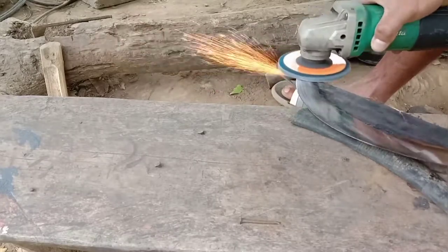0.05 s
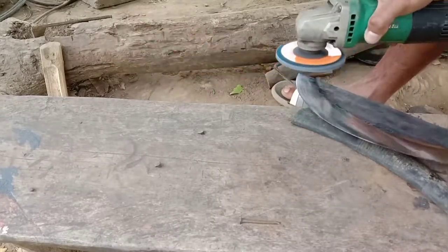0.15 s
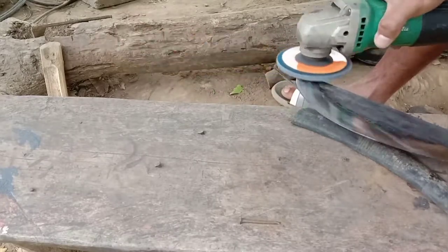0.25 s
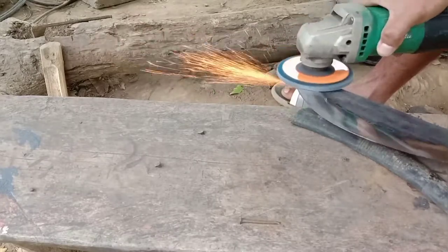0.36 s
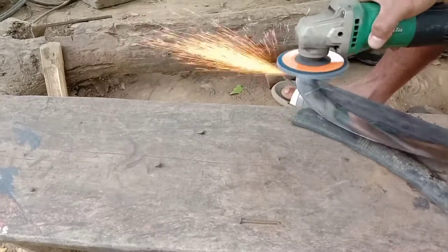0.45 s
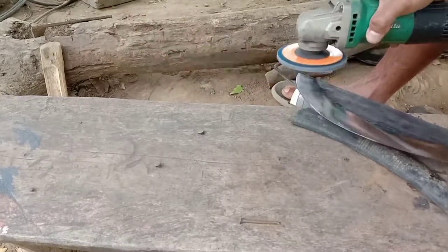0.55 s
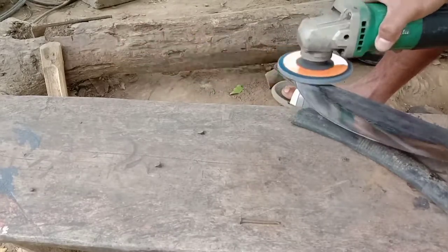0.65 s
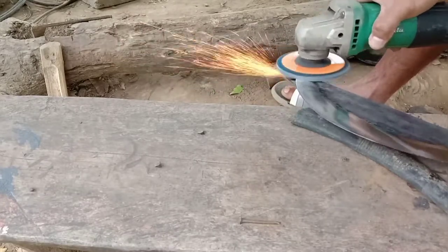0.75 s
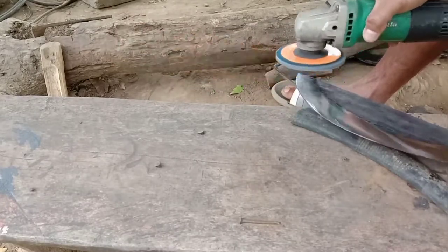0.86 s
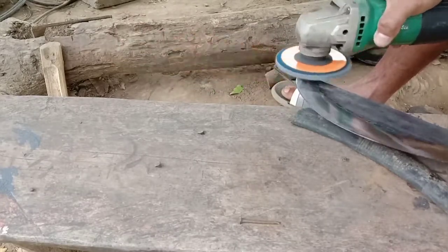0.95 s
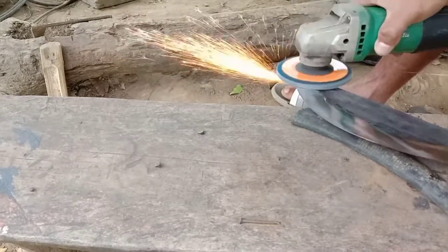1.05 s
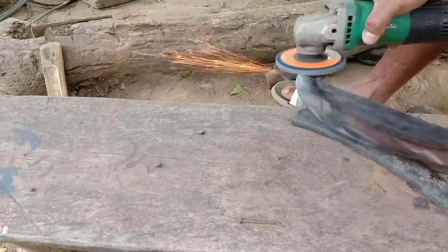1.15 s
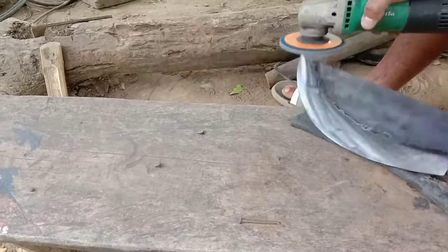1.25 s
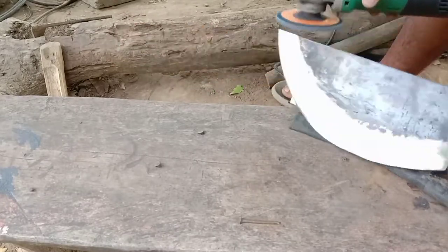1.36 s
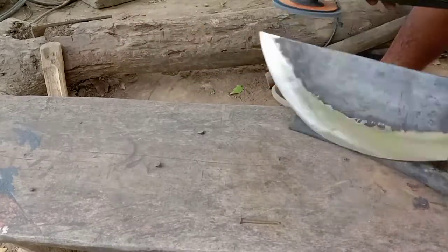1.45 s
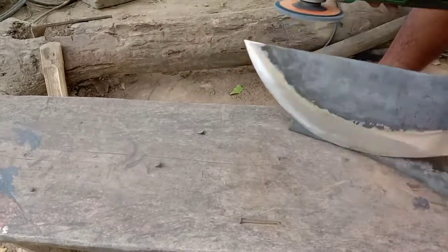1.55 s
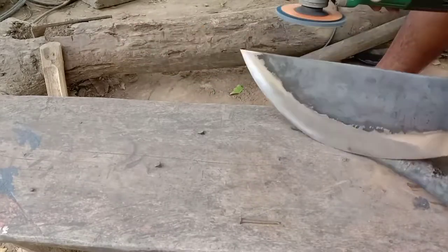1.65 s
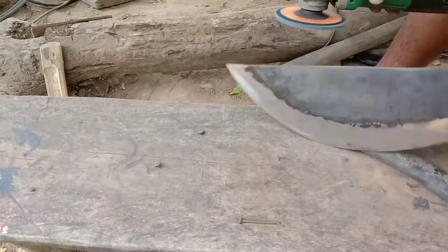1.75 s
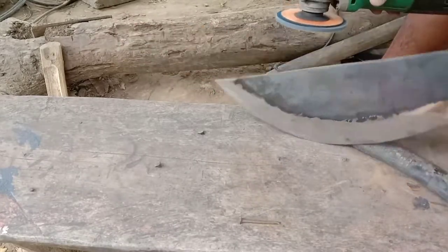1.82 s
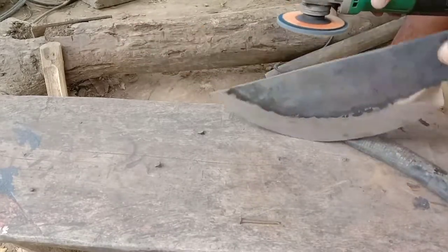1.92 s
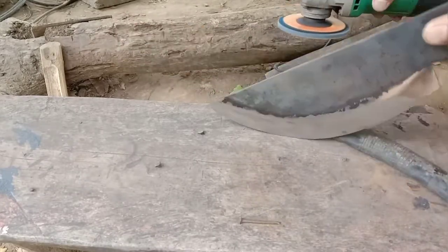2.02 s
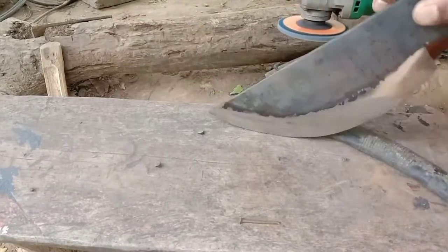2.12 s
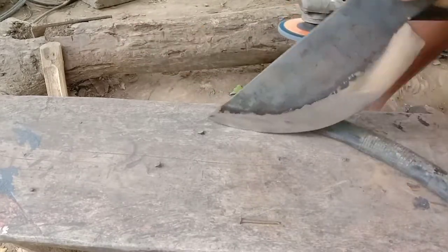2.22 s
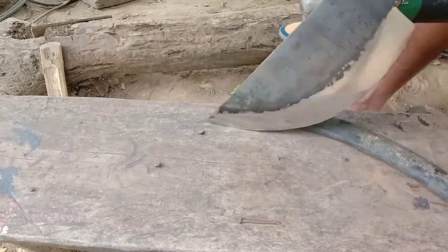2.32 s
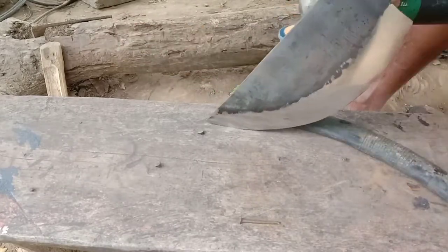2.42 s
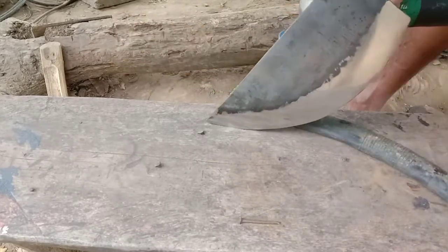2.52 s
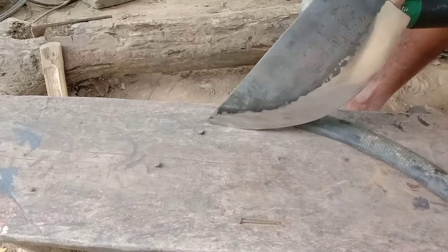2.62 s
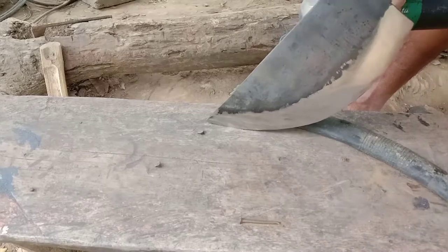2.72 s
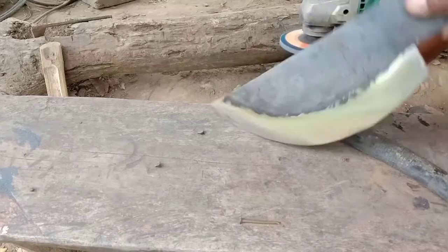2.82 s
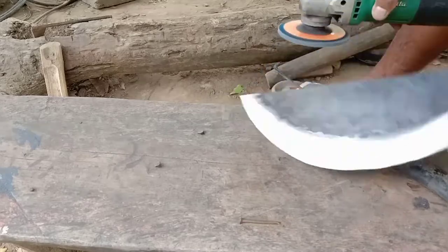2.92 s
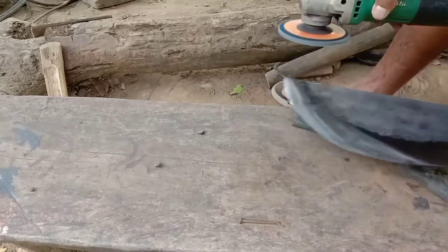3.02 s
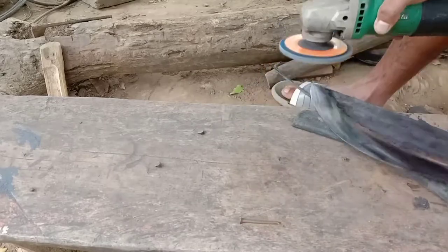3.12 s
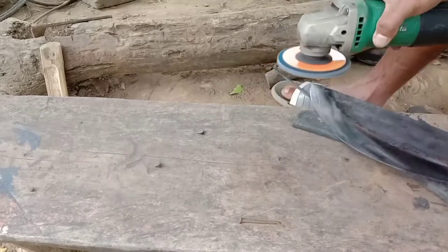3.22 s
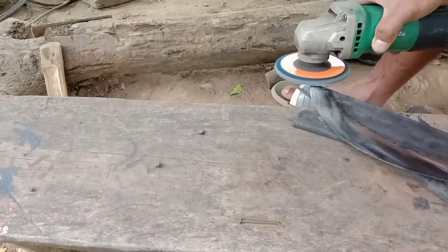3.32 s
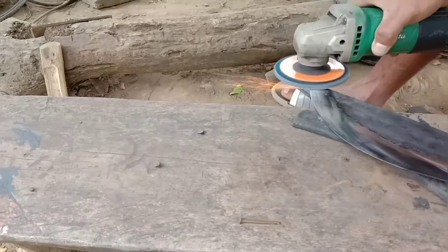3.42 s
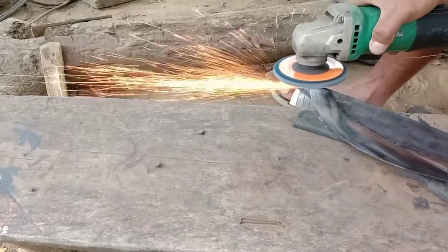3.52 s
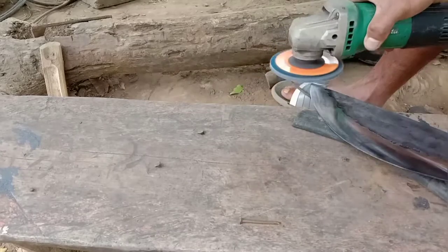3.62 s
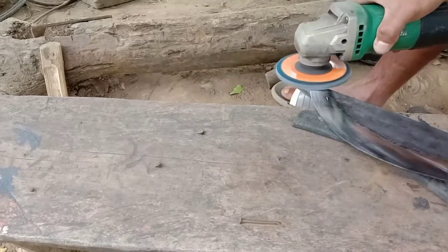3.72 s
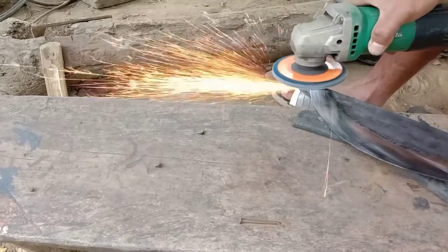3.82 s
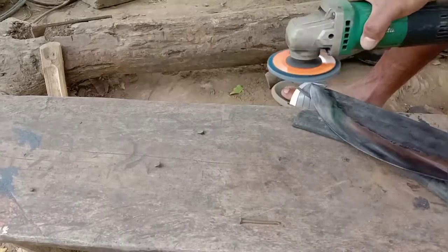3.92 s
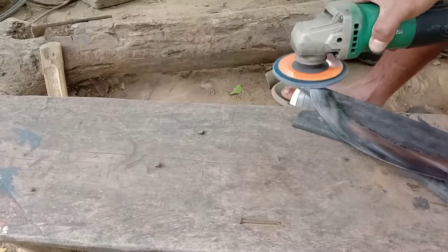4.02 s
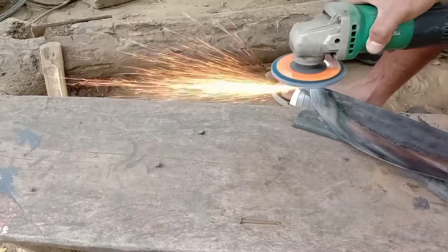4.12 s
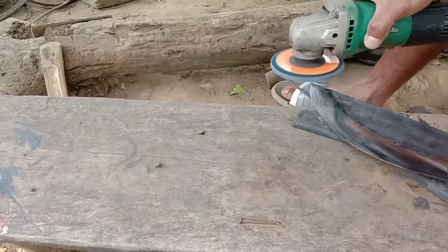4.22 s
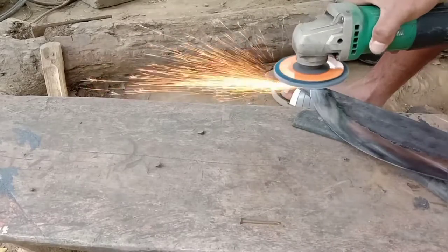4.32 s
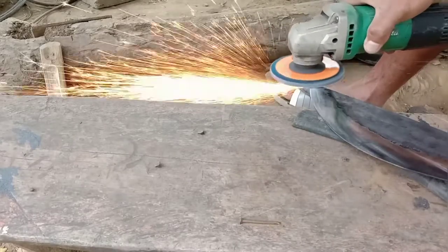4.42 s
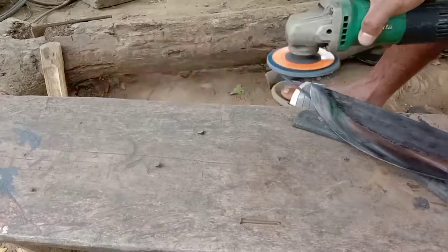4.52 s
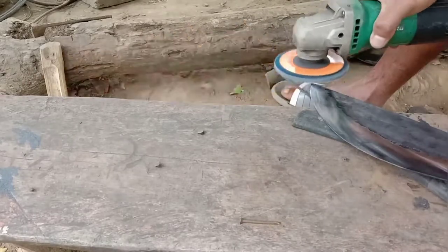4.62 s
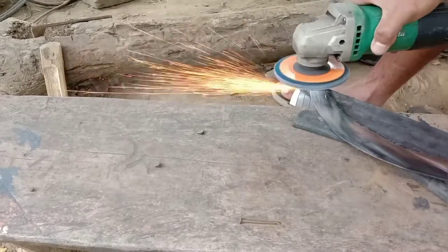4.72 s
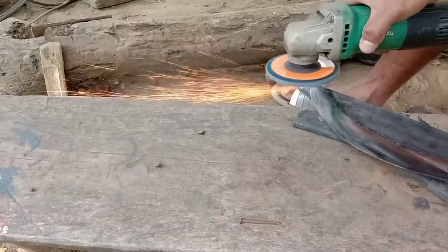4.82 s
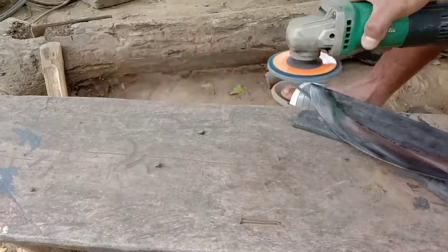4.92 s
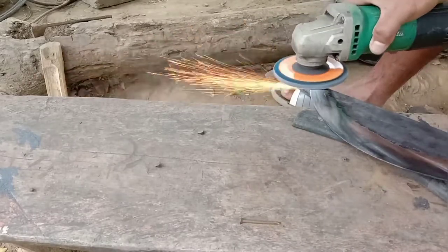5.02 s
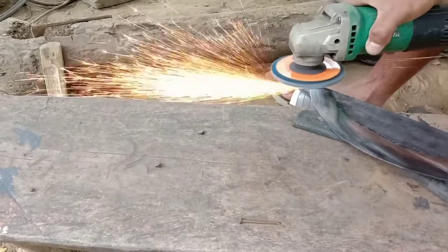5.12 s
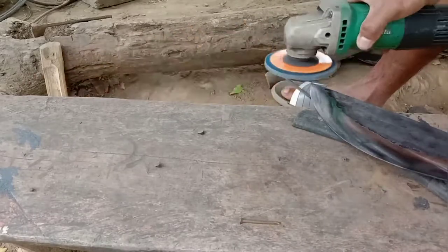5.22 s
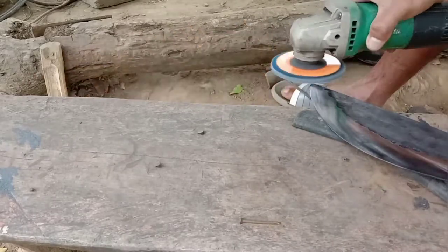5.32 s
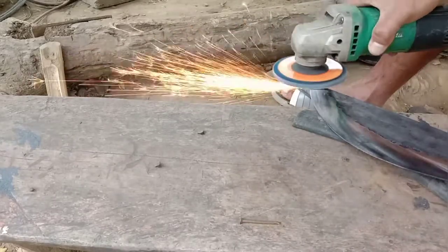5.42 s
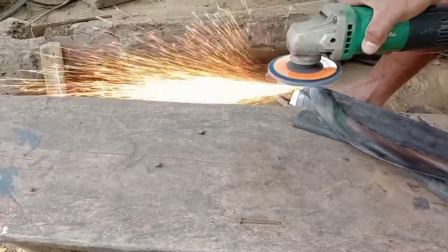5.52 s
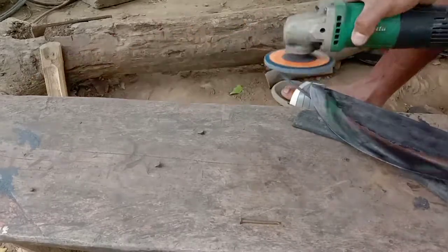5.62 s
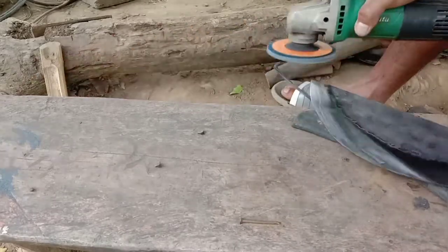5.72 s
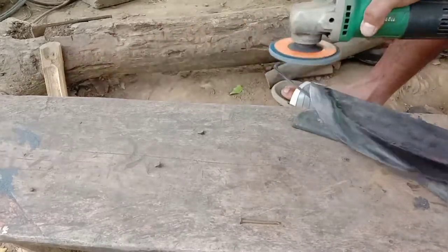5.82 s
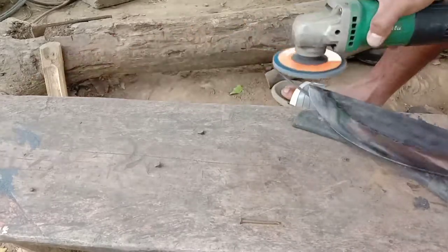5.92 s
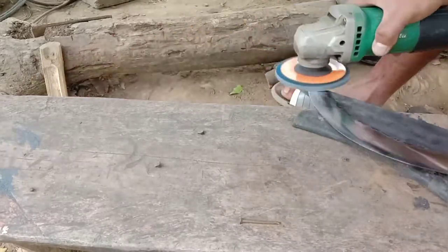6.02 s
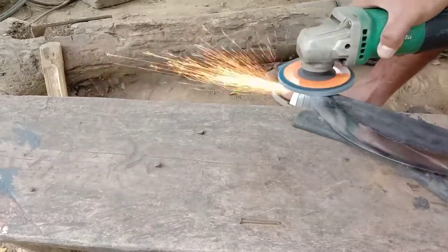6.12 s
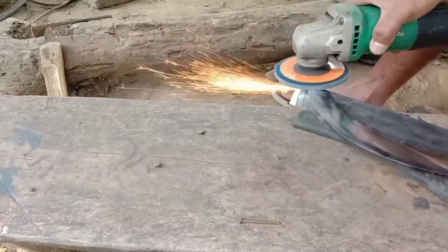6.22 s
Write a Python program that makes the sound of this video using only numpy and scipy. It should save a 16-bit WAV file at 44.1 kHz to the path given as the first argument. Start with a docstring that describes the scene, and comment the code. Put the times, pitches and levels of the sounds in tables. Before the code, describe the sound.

An angle grinder is already running outdoors, a high, siren-like whine over rushing air, with gears churning quietly underneath. From 0.1 to 1.2 seconds its disc bites a steel blade in four short, hissing scrapes, the whine sagging with each and climbing back. Grit strikes the single microphone with pops and crackles, strongest around 0.5 seconds.

From 1.3 to 3.5 seconds the disc spins free. The pitch rises and levels off, and the whine softens between 2 and 3 seconds before returning.

From 3.5 to 5.6 seconds come seven more strokes, about three a second, ringing more brightly, with metallic zings and brief lower groans. The pitch dips with each. Sparks pop and crackle on the microphone, with the densest showers near 5.2 and 5.6 seconds. A last stroke starts at about 6.1 seconds, the grinder still running. A very faint rumble of air lies beneath.

```python
"""A siren-like whine over rushing air: an angle grinder runs outdoors and bites a steel blade in short strokes.
The whine is its cooling fan, which sags under each load and climbs back as the disc spins free.
Abrasive grains hiss on the steel and ring the blade, now and then with a groan or a zing.
Sparks and grit pelt the single microphone with pops and crackling showers.
Underneath, the gears churn and a faint draught rumbles."""
import sys
import numpy as np
from scipy import signal
from scipy.fft import rfft, irfft, next_fast_len
from scipy.io import wavfile
from scipy.ndimage import map_coordinates

SR = 44100
rng = np.random.default_rng(int(sys.argv[2]) if len(sys.argv) > 2 else 0)


def write(x):
    x = np.atleast_2d(x).T
    wavfile.write(sys.argv[1], SR, np.round(np.clip(x, -1, 1) * 32767).astype(np.int16))

N = 276066
T = np.arange(N) / SR

# the fan's whine and its octave, beaming at the microphone as the tool turns in the hand: t/s, level/dB
WHINE_BEAM = [(0, -17), (.19, -20), (.28, -17), (.48, -21.5), (.62, -16.5), (1.2, -19), (1.35, -20.5),
              (1.8, -22.5), (2.18, -32.5), (2.37, -27), (2.5, -37), (2.84, -32.5), (2.93, -25),
              (3.1, -20.5), (3.47, -16.5), (3.66, -22.5), (3.78, -17), (3.94, -20), (5.7, -20.5),
              (6.12, -16.3), (6.26, -17.5)]
OCTAVE_BEAM = [(0, -31.5), (.45, -33.5), (1.15, -32), (1.46, -38.5), (2.06, -36.5), (2.22, -47),
               (2.36, -32.5), (2.85, -35.5), (4.55, -32), (5.45, -32), (5.88, -38.5), (6.05, -33.5),
               (6.26, -26)]
# the grinder turning toward and away from the microphone: t/s, vent rush/dB, brush fizz/dB, vent hollow
# resonance/dB
VENT_BEAM = [(0, -25, -30, -31.5), (1.08, -24, -27, -30), (1.35, -24.5, -41, -46), (1.6, -25, -44, -35),
             (2.05, -29, -38.5, -36), (2.6, -28.5, -33, -38.5), (2.85, -28.6, -37.5, -38),
             (3, -25.5, -38, -36), (3.3, -25.5, -32, -34), (3.55, -25, -34, -33), (4.5, -23.5, -31, -35),
             (5.4, -23, -33, -38), (5.85, -24.5, -33, -30), (6.1, -25.5, -27, -32.5), (6.26, -22, -27, -42)]
# tone colour of the air's rush and of the brushes' fizz: f/Hz, level/dB
RUSH_EQ = [(400, -31), (1000, -14.5), (1800, -13), (2500, -12.5), (3300, -6), (3900, -6), (5000, -1.5),
           (5800, 4), (6250, -6), (7500, -6), (8300, -11), (9400, -16.5), (12000, -16), (15400, -13)]
FIZZ_EQ = [(5000, -26), (9500, -13), (12200, 1.5), (13800, 1), (15300, 6.5)]
# the vents' hollow resonance: f/Hz, width/Hz, level/dB
HOLLOW_MODE = [(4430, 880, 0)]
# the disc on the steel; load is the share of free speed that a stroke would take away if held:
# touch/s, lift/s, load at touch/%, load at lift/%, scrape/dB, ring/dB
DISC_STROKES = [ (.104, .187, 19, 7.9, -32.5, -34), (.396, 0.566, 14.6, 29, -36.5, -40),
                (.763, 0.881, 25, 17, -35, -35), (1.105, 1.238, 19.6, 23, -35.5, -30),
                (3.496, 3.639, 4.5, 12.4, -34.5, -24.5), (3.824, 3.964, 11.8, 19.7, -35, -24),
                (4.137, 4.237, 19.1, 15.4, -34, -22), (4.393, 4.507, 15.2, 20.5, -33.5, -23),
                (4.744, 4.888, 11.5, 21.5, -35.5, -22), (5.094, 5.231, 7.3, 27, -34.5, -21),
                (5.454, 5.636, 11, 25.5, -34, -23), (6.087, 6.267, 5.5, 18, -36.5, -27.5)]
# tone colour of the scrape: f/Hz, level/dB
SCRAPE_EQ = [(300, -5.5), (1000, -5), (2000, -0.5), (2600, -27), (5000, -12), (6600, -16), (7500, -1.5),
             (9500, 1), (11000, 4), (12000, 3), (13500, 5), (15400, -9)]
# modes of the steel blade under the disc: f/Hz, width/Hz, level/dB
BLADE_MODES = [(4000, 130, -21.5), (4930, 120, -16), (5320, 100, -14), (5640, 140, -20), (5880, 106, -9),
               (6050, 123, -6.5), (6155, 154, -2), (7070, 220, 1), (7570, 130, 0), (8020, 260, -7),
               (8835, 150, -5), (10470, 250, -4), (10970, 180, -19), (11460, 270, -9.5), (12760, 260, -7.5),
               (14300, 320, -5), (15000, 450, 0)]
# the disc catches the blade's low mode: t/s, level/dB
BLADE_GROANS = [(3.595, -42), (3.925, -34.5), (4.18, -36), (4.45, -33), (4.83, -28), (5.18, -30),
                (5.47, -35.5), (5.527, -29), (6.195, -33)]
# the disc catches one high mode: t/s, f/Hz, level/dB
BLADE_ZINGS = [(1.228, 7550, -32), (3.575, 6250, -21), (3.616, 7600, -30), (3.957, 6150, -26),
               (4.15, 5810, -26), (4.407, 5900, -26), (4.455, 6200, -25), (4.83, 4930, -27),
               (5.223, 7430, -36), (5.55, 6190, -25.5), (5.625, 12530, -29), (5.625, 14300, -36)]
# heavy single grains on the microphone: t/s, level/dB
GRIT_POPS = [(.100, -23.5), (.175, -18.5), (.190, -15.5), (.392, -15.5), (.421, -11.5), (.449, -4),
             (0.536, -7), (.552, -11), (.796, -15), (.822, -14), (.852, -6.5), (1.095, -16.5),
             (1.103, -13.5), (1.161, -19), (3.618, -6.5), (3.952, -8), (4.208, -9.5), (4.510, -9.5),
             (4.740, -13), (4.86, -21), (5.567, -17), (5.620, -14)]
# the spark jet sweeps over the microphone: start/s, end/s, level/dB
SPARK_SHOWERS = [(0.427, 0.492, -27), (0.468, 0.519, -19), (.525, 0.576, -19.5), (0.802, 0.836, -31.5),
                 (.832, 0.878, -26.5), (1.088, 1.179, -42), (3.929, 3.972, -23.5), (4.182, 4.231, -30.5),
                 (4.456, 4.528, -26), (5.2, 5.217, -26), (5.219, 5.245, -18), (5.551, 5.645, -18)]
# the microphone port's answer to a grain: f/Hz, level/dB
PORT_EQ = [(10, -35), (30, -16), (65, 1), (140, 4), (280, -1.5), (550, -8.5), (1300, -9), (2100, -19.5),
           (3200, -19), (5000, -48), (10000, -49)]
# resonances of the gear housing: f/Hz, width/Hz, level/dB
HOUSING_MODES = [(451, 250, -5), (895, 327, 1.5), (1383, 330, 2), (1670, 1000, -3)]
# tone colour of the draught: f/Hz, level/dB
DRAUGHT_EQ = [(20, -15), (60, -5.5), (140, 0.5), (230, -4.5), (600, -19), (2000, -70)]
# soft low puffs of draught: t/s, half length/s, level/dB
DRAUGHT_PUFFS = [(1.64, 0.036, -47), (1.712, 0.021, -51), (1.829, 0.027, -49), (2.558, 0.031, -47),
                 (5.8, .035, -49), (5.907, 0.051, -48), (6.047, .025, -51), (6.25, .05, -58)]

FREE_WHINE_HZ, FIRM_LOAD = 5607, 18  # pitch at full free speed; load of an ordinary firm stroke in %


def fan_whine(load, sag, drift_hz=2):
    """The fan's blades chop the air into a tone and its octave, weaker and shakier as the motor labours."""
    tone_db, = curves(WHINE_BEAM)
    octave_db, = curves(OCTAVE_BEAM)
    sway_db = (.7 + .13 * sag) * wobble(24)  # the hand moves
    tone_db = tone_db - .8 * sag - .18 * load + sway_db
    octave_db = octave_db - .25 * sag - .29 * load + 1.9 * wobble(18)
    shake = (.12 + .006 * sag + .012 * load) * wobble(300)
    phase = phase_of(fan_pitch(sag) + drift_hz * wobble(40)) + shake
    flutter_db = (.47 + .1757 * sag) * wobble(70)
    tone = amp(tone_db + flutter_db) * np.sin(phase)
    octave = amp(octave_db + .97 * wobble(90)) * np.sin(2 * phase + .3 * wobble(220))
    return np.sqrt(2) * (tone + octave)


def fan_pitch(sag):
    """The rate in Hz at which the fan's blades pass, sag percent below free speed."""
    return FREE_WHINE_HZ * (1 - sag / 100)


def motor(inertia_s=.257, settle_s=1.5, settle_share=.146):
    """Load and sag (lost speed), both in percent: the rotor follows with inertia, then settles slowly."""
    load = sum(gate(touch, lift, edge=.01) * np.interp(T, [touch, lift], [first, last])
               for touch, lift, first, last, *_ in DISC_STROKES)
    sag = (1 - settle_share) * rotor_lag(load, inertia_s) + settle_share * rotor_lag(load, settle_s)
    return load, sag


def rotor_lag(load, lag_s, start_sag=5.87):
    """The rotor trails the load, starting start_sag percent short of its speed."""
    pole = np.exp(-1 / (lag_s * SR))
    return signal.lfilter([1 - pole], [1, -pole], load) + start_sag * np.exp(-T / lag_s)


def vent_air(sag, flutter_db=.84):
    """Cooling air rushes out with a hollow resonance, over the fine fizz of the motor's sparking brushes; all
    three fade as the fan slows."""
    rush_db, fizz_db, hollow_db = curves(VENT_BEAM)
    rush = amp(rush_db - .5 - .3746 * sag) * plank_echo(noise(colour, RUSH_EQ))
    fizz = amp(fizz_db - 1 - .9 * sag + 1.1 * wobble(900)) * plank_echo(noise(colour, FIZZ_EQ))
    hollow = amp(hollow_db - 1.2 * sag) * noise(resonances, HOLLOW_MODE)
    return amp(flutter_db * wobble(60)) * (rush + fizz + hollow)


def plank_echo(x, delay_s=.000906, sway=.087, echo_db=-13):
    """Sound plus its bounce off a plank, at rms 1; the path changes as the hand moves."""
    late_s = delay_s * (1 + sway * wobble(2.49))
    return unit(x + amp(echo_db) * np.interp(T - late_s, T, x))


def grinding(sag, scrape_db=2, shimmer_db=1.5, bite_db=-.2, light_touch_db=-29,
             graze_s=.0093, attack_s=.02, release_s=.018):
    """Abrasive grains scrape the steel and ring it, biting a little harder once per turn of the disc."""
    turn = phase_of(fan_pitch(sag) / 32)  # 32 fan blades pass per turn of the disc
    abrasive = unit(amp(bite_db * np.sin(turn) + .72 * wobble(250)) * grains(16000))
    scrape, sing = np.zeros(N), np.zeros(N)
    for touch, lift, first, last, stroke_db, ring_db in DISC_STROKES:
        contact = gate(touch - graze_s, np.inf, attack_s) * gate(-np.inf, lift + release_s / 2, release_s)
        press = np.interp(T, [touch, lift], [first, last]) / FIRM_LOAD
        length = lift - touch
        # the scrape follows the load; the blade sings most just past mid-stroke
        scrape += contact * amp(stroke_db) * np.abs(press) ** .57
        sing += contact * amp(ring_db) * swell(touch + .62 * length, .61 * length)
    low_force = sing * abrasive
    # a light touch leaves the high modes quiet
    high_force = amp(shimmer_db) * scrape * sing / (sing + amp(light_touch_db)) * abrasive
    steel = amp(scrape_db) * scrape * unit(filtered(abrasive, lambda hz: colour(SCRAPE_EQ, hz)))
    for hz, width, db in BLADE_MODES:
        shift_db = 3 * wobble(22)  # the moving contact point favours now one mode, now another
        steel += amp(db + shift_db) * ring(low_force if hz < 6650 else high_force, hz, width)
    return steel


def blade_chatter(groan_hz=1390, groan_half_s=.029, zing_half_s=.024):
    """The disc catches single modes of the blade: a low groan and high zings swell and die."""
    groans = sum(amp(db) * swell(t, groan_half_s) for t, db in BLADE_GROANS) * rough_note(groan_hz)
    zings = sum(amp(db) * swell(t, zing_half_s) * rough_note(hz) for t, hz, db in BLADE_ZINGS)
    return groans + zings


def rough_note(hz, waver_hz=14, rough_db=2.5, jitter_rad=.38):
    """One mode of the blade chattering against the disc, rms near 1."""
    phase = phase_of(hz + waver_hz * wobble(60)) + jitter_rad * wobble(250)
    return np.sqrt(2) * amp(rough_db * wobble(120)) * np.sin(phase)


def sparks(shower_db=2, low_cut_hz=320, clump_db=2.5, ceiling=.6):
    """Grit strikes the microphone port, singly and in dense, clumpy showers."""
    click = impulse(PORT_EQ)
    hits, jet = np.zeros(N), np.zeros(N)
    for (t, db), sign in zip(GRIT_POPS, rng.choice([-1, 1], len(GRIT_POPS))):
        hits[round(t * SR)] += sign * amp(db)
    for start, end, db in SPARK_SHOWERS:
        grains_per_s = 3500 * amp(db + 19) ** 1.4  # louder is denser
        jet += amp(db + shower_db) * gate(start, end, edge=.015) * grains(grains_per_s)
    jet *= amp(clump_db * wobble(130))
    # fine dust thumps less than a single heavy grain
    jet = signal.lfilter(*signal.butter(1, low_cut_hz, "high", fs=SR), jet)
    pressure = signal.fftconvolve(hits + jet / np.linalg.norm(click), click)[:N]
    return ceiling * np.tanh(pressure / ceiling)  # the port overloads softly on the hardest hits


def gears(level_db=-40.5, rattle_db=1.34, drift_db=.5):
    """The gear train churns inside its resonant housing."""
    level = amp(level_db + rattle_db * wobble(200) + drift_db * wobble(4.86))
    return level * noise(resonances, HOUSING_MODES)


def draught(load, still_db=-74, work_db=-56, lumpy_db=4):
    """A faint, lumpy rumble of air on the microphone, stirred by each stroke and by stray puffs."""
    puffs = sum(amp(db) * swell(t, half_s) for t, half_s, db in DRAUGHT_PUFFS)
    level = amp(still_db) + amp(work_db) * load / FIRM_LOAD + puffs
    return level * unit(amp(lumpy_db * wobble(25)) * noise(colour, DRAUGHT_EQ))


def amp(db):
    """Decibels to gain."""
    return 10 ** (np.asarray(db) / 20)


def unit(x):
    """Scaled to rms 1."""
    return x / np.sqrt(np.mean(x ** 2) + 1e-20)


def phase_of(hz):
    """Running phase of a gliding pitch, in radians."""
    return 2 * np.pi * np.cumsum(hz) / SR


def curves(rows):
    """One automation curve for each column after the time."""
    times, *columns = np.transpose(rows)
    return [np.interp(T, times, column) for column in columns]


def gate(start, end, edge):
    """Open between two times, with fades edge seconds long."""
    return np.clip((T - start) / edge + .5, 0, 1) * np.clip((end - T) / edge + .5, 0, 1)


def swell(t, half_s):
    """A bell-shaped rise and fall around a time."""
    return np.exp(-np.minimum(((T - t) / half_s) ** 2, 50))


def wobble(rate):
    """A smooth random curve, rate knots a second."""
    knots = rng.standard_normal(int(N * rate / SR) + 4)
    coarse = T[::16]
    return np.interp(T, coarse, map_coordinates(knots, [coarse * rate]))


def grains(rate):
    """Impacts of random size and sign, about rate a second, mean power 1."""
    chance = np.clip(rate / SR, 1e-4, 1)
    return (rng.random(N) < chance) * rng.standard_normal(N) / np.sqrt(chance)


def colour(points, hz):
    """Gain of an EQ curve, its points joined on a log axis."""
    f, db = np.transpose(points)
    return amp(np.interp(np.log(hz + 1), np.log(f + 1), db))


def resonances(modes, hz):
    """Gain of separately driven, steep-sided modes."""
    gains = (amp(db) * (hz * width) ** 2 / ((f * f - hz * hz) ** 2 + (hz * width) ** 2)
             for f, width, db in modes)
    return np.sqrt(sum(gain ** 2 for gain in gains))


def filtered(x, response):
    """x shaped by a gain that depends on frequency."""
    size = next_fast_len(N + SR // 2)
    return irfft(rfft(x, size) * response(np.fft.rfftfreq(size, 1 / SR)), size)[:N]


def noise(shape, table):
    """Noise of rms 1 with the spectrum shape(table, hz)."""
    return unit(filtered(rng.standard_normal(N), lambda hz: shape(table, hz)))


def ring(force, hz, width):
    """One steep-sided mode driven by a force; white noise keeps its rms."""
    b, a = signal.iirpeak(hz, hz / width, fs=SR)
    return signal.lfilter(b, a, signal.lfilter(b, a, force)) * np.sqrt(2 * SR / (np.pi * width))


def impulse(points, size=4096):
    """The minimum-phase click of an EQ curve, peak 1."""
    cepstrum = irfft(np.log(colour(points, np.fft.rfftfreq(size, 1 / SR))))
    cepstrum[1:size // 2] *= 2
    cepstrum[size // 2 + 1:] = 0
    click = irfft(np.exp(rfft(cepstrum)))
    return click / np.abs(click).max()


def scene():
    """The strokes load the motor; everything reaches one microphone in the open air."""
    load, sag = motor()
    grinder = fan_whine(load, sag) + vent_air(sag) + gears()
    mono = grinder + grinding(sag) + blade_chatter() + sparks() + draught(load)
    return np.array([mono, mono])


def record(dry, top_hz=15550):
    """A brick-wall high cut takes off the very top."""
    return np.array([filtered(channel, lambda hz: hz < top_hz) for channel in dry])


dry = scene()
out = record(dry)
write(out)
```